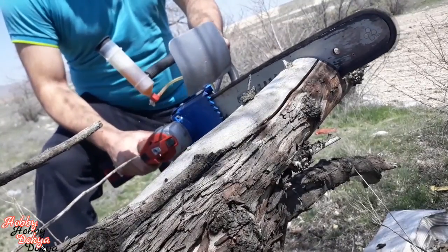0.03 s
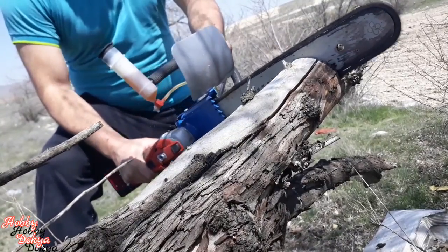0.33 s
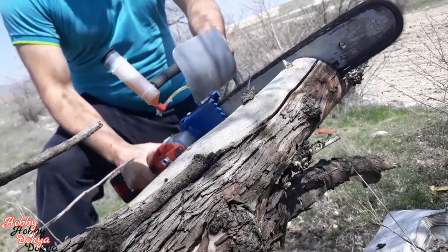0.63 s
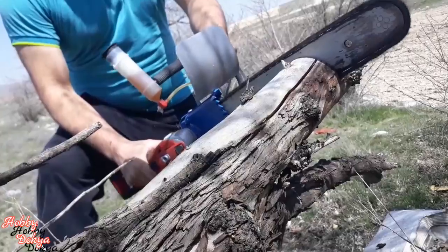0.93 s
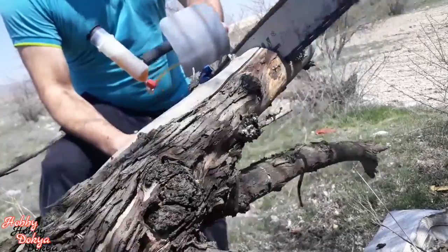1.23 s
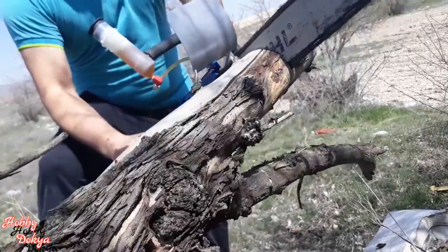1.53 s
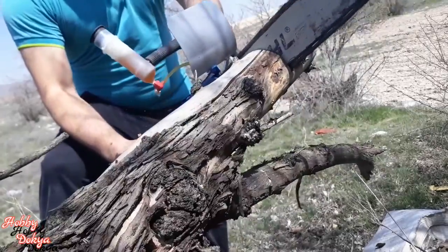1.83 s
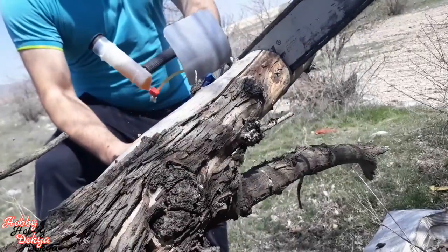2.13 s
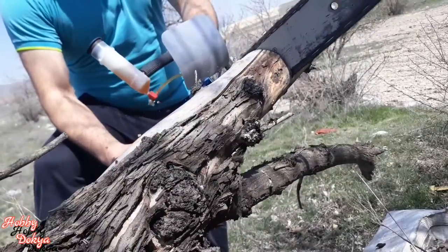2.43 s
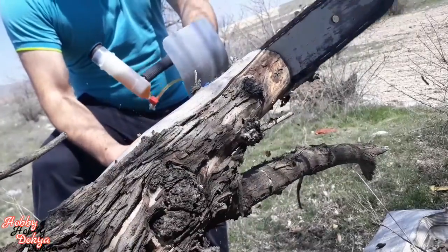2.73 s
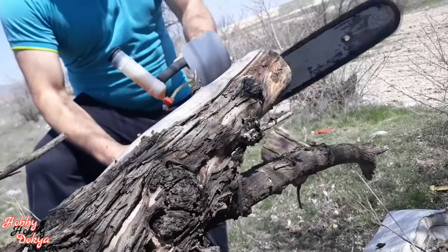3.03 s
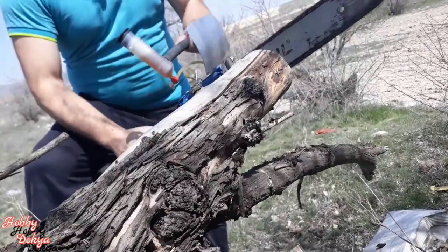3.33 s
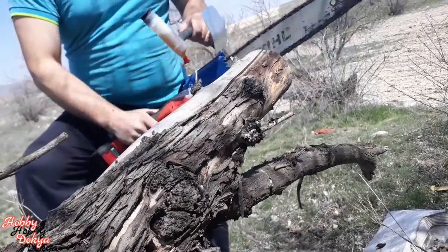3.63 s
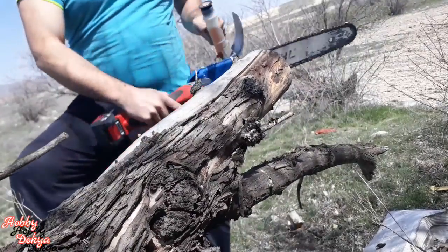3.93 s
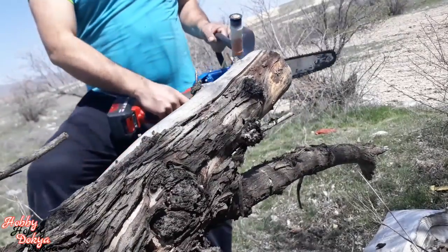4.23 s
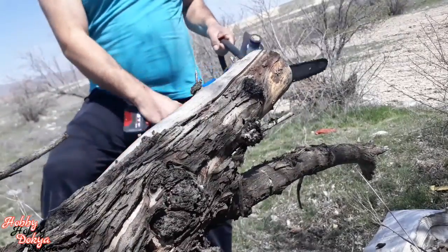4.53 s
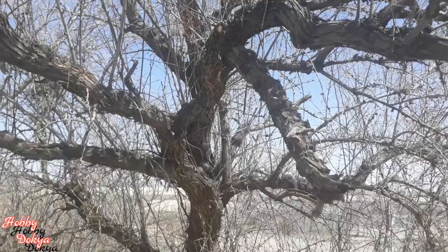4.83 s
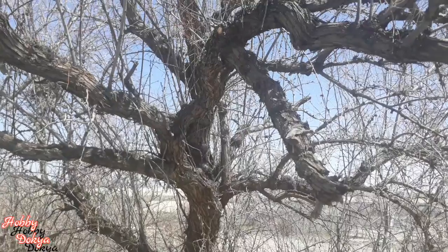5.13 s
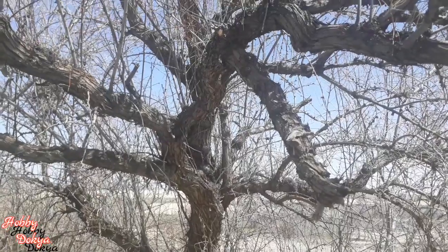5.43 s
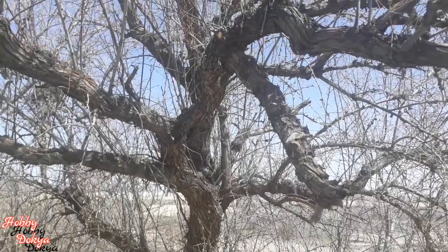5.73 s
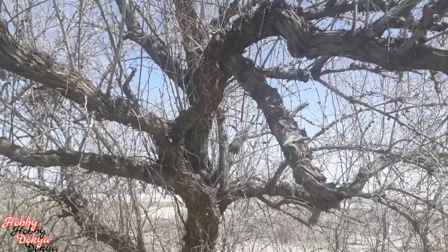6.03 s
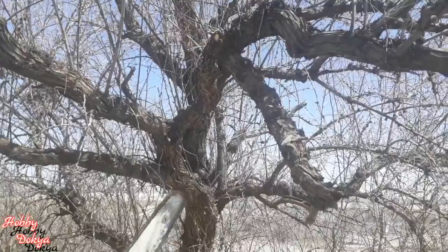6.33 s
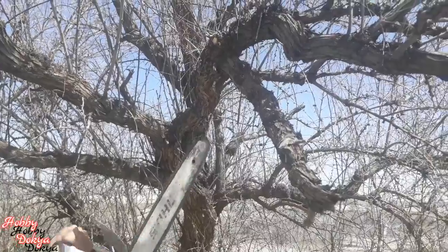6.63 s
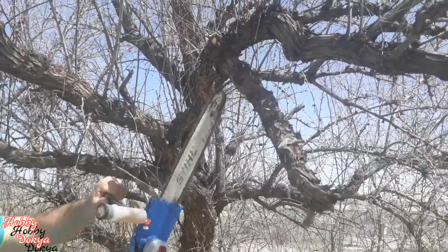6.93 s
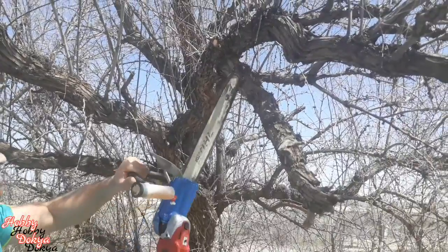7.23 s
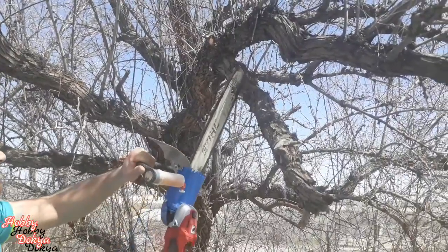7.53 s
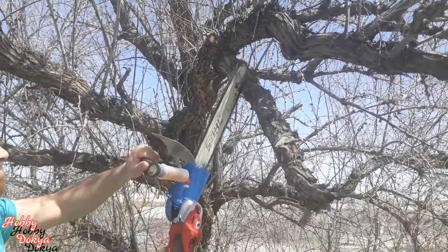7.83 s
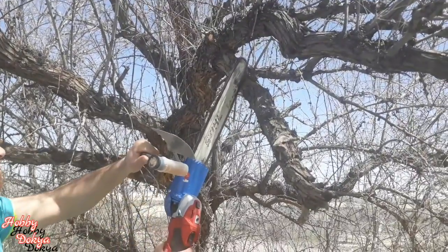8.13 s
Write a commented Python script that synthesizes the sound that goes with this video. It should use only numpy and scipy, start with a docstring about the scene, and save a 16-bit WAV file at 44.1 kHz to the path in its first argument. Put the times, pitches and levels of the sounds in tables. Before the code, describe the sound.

A cordless electric chainsaw chatters loudly through a dry log in quiet open air. It breaks through with a wooden knock, races briefly, then winds down, the slack chain rattling and clacking to a stop. The trigger clicks, a thin high whine starts, and the chain climbs smoothly to a fast, hissing whir. Near the end the tip grazes a branch with a short, bright rasp.

```python
"""A cordless angle grinder fitted with a chainsaw bar cuts a dry log in quiet open air.
First the teeth chatter in the kerf, and their impacts excite the modes of bar and log. The chain breaks
through, races, then coasts against friction until its slack links clack to a stop. The trigger clicks,
the motor drive whines, and a soft start ramps the chain up to full speed. Last, the tip grazes a branch."""
import sys
import numpy as np
from scipy import signal
from scipy.fft import rfft, irfft, next_fast_len
from scipy.io import wavfile
from scipy.ndimage import uniform_filter1d

SR = 44100
rng = np.random.default_rng(int(sys.argv[2]) if len(sys.argv) > 2 else 0)


def inscribe(sig):
    """Save sig as 16-bit PCM at rate SR to the path in sys.argv[1].

    A 1-D sig is mono; a 2-D sig holds one channel per row.
    Samples are clipped to [-1, 1] before scaling.
    """
    pcm = np.round(np.clip(np.atleast_2d(sig).T, -1, 1) * 32767)
    wavfile.write(sys.argv[1], SR, pcm.astype(np.int16))


N = 361179
TIME = np.arange(N) / SR
# the chain breaks through, the trigger is released, the chain stops, the motor restarts
BREAK_S, RELEASE_S, STOP_S, START_S = 2.88, 3.27, 4.77, 5.16
LOADED_SPEED, TOP_SPEED = 89.8, 119.35  # sprocket in the wood and running free, turns/s
GEAR_RATIO = 2.707  # motor turns per sprocket turn

# snags of the teeth: t/s, half-width/s, loss of speed/(turns/s)
TOOTH_SNAGS = [(1.19, .03, 40), (1.65, .04, 12)]
# bounce of the bar in the kerf: t/s, modulation depth/dB
BAR_BOUNCE = [(0, 2.5), (.92, 2), (1.04, 5), (1.3, 3.5), (1.62, 1), (2.08, 2.5), (2.4, 2.3), (2.56, 3.5),
              (2.88, 2.1)]
# the cut as the kerf deepens: t/s, body level/dB, clatter level/dB, hiss level/dB
CUT_LEVELS = [(0, -39.5, -25.5, -26.5), (1.0, -37.5, -25, -26.8), (1.65, -35.5, -25, -27.5),
              (2.2, -35.5, -24, -26), (2.68, -34.5, -27.5, -28), (2.88, -33.5, -26.5, -27.4)]
# spectra of the chain cutting, coasting, driven slowly and driven fast: f/Hz, relative level/dB
CUT_SPECTRUM = [(24, -44), (40, -31.5), (110, -12), (165, -14.5), (225, -4), (340, -8), (450, -8),
                (700, -6), (1800, -2), (2600, -1), (6400, -3.5), (9400, -21.5), (11500, -16),
                (15500, -20.5)]
COAST_SPECTRUM = [(59, -61), (100, -33), (330, -27.5), (450, -17), (560, -23), (950, -15), (1200, -5),
                  (2400, -3), (3800, 3), (6900, 1.5), (9300, -12), (11100, -7.5), (15500, -9.5)]
SLOW_SPECTRUM = [(59, -60), (100, -39), (330, -24.5), (560, -13.5), (1000, -14), (1500, -12.5),
                 (2000, -8.5), (4200, 2), (6500, 2.5), (8100, -5.5), (11200, -12), (12200, -14),
                 (15500, -16.5)]
FAST_SPECTRUM = [(59, -43), (100, -32), (330, -34), (600, -23), (800, -15.5), (1060, -17), (2000, -15),
                 (2800, -13), (4200, -5.5), (6000, 6.5), (8060, 0.5), (11000, -3), (12300, -5),
                 (15500, -6.5)]
# resonances of bar and guard in the same four states: f/Hz, bandwidth/Hz, lift/dB
CUT_PEAKS = [(406, 110, 6), (813, 43, 6.5), (1060, 310, 3), (1500, 75, 3.5), (1753, 130, 5),
             (2170, 120, 2.5), (2533, 290, 5), (2973, 270, 3.5), (4055, 79, 6), (5450, 180, 4),
             (7090, 360, 2), (8400, 430, 2.5), (10400, 460, 2.0), (14100, 540, 1.5)]
COAST_PEAKS = [(793, 170, 11), (1170, 120, 2.8), (1510, 140, 5.1), (1840, 320, 6.8), (3015, 78, 8.5),
               (3470, 44, 3.5), (3750, 96, 5.3), (4500, 270, 3.2), (5380, 670, 2.9), (6900, 320, 1.3),
               (7520, 220, 4.7), (8450, 430, 3.7), (10340, 470, 3.5), (13600, 420, 1.5)]
SLOW_PEAKS = [(590, 34, 3.3), (1227, 93, 6.4), (1444, 190, 7), (1660, 83, 4.4), (2390, 470, 2.9),
              (4280, 380, 4.5), (5120, 280, 2.2), (7140, 390, 2.1), (8540, 400, 2.9), (10300, 210, 4.2),
              (10900, 420, 4.6), (13500, 540, 3.0)]
FAST_PEAKS = [(1320, 120, 6.4), (1500, 60, 5.9), (1640, 89, 5.5), (2440, 290, 7.7), (3070, 160, 2.9),
              (3600, 110, 6.3), (4470, 120, 2.0), (4850, 470, 2.9), (6010, 420, 5.4), (6700, 360, 1.6),
              (7600, 260, 3.5), (8730, 560, 4.7), (10000, 450, 2.5), (11000, 740, 6.7), (13150, 470, 1.5)]
# modes of the log, shifting as the kerf deepens: first f/Hz, last f/Hz, bandwidth/Hz, relative level/dB
LOG_RESONANCES = [(130.6, 120, 4.7, -54), (280.4, 300, 3.7, -52), (436.3, 320, 18, -48.5)]
# passing modes of the wood: f/Hz, bandwidth/Hz, relative level/dB, share of the cut where loudest
KERF_RESONANCES = [(281, 49, -43.5, 0.12), (132, 28, -45, .03), (2730, 180, -35, .48),
                   (1750, 130, -37.5, 0.59), (399, 30, -44.5, 0.67), (985, 190, -38.5, .62),
                   (131, 8.1, -44.5, 0.704), (628, 17, -50, 0.46), (620, 86, -38.5, 0.844),
                   (305, 21, -39.5, 0.827), (416, 29, -47, 1)]
# hum of the six-toothed sprocket and the motor: multiple of the sprocket rate, relative level/dB
HUM_ORDERS = [(2.707, -60), (4, -60), (5.414, -52), (6, -41), (7, -50), (8.12, -54), (10.83, -53),
              (12, -52), (14, -55), (19, -50), (20, -51), (27.07, -48)]
# outdoor background: f/Hz, relative level/dB
AIR_SPECTRUM = [(15, -34), (25, -6.5), (49, -9.5), (103, -5.5), (383, -19), (879, -15), (1240, -22),
                (4380, -24.5), (9770, -35), (15000, -33)]
# knocks of wood and handling: t/s, f/Hz, bandwidth/Hz, decay time/s, level/dB
KNOCKS = [(2.83, 540, 140, 0.024, -32.5), (3.006, 250, 91, 0.035, -45.5), (4, 170, 149, 0.013, -57),
          (4.735, 151, 200, .006, -70), (7.101, 230, 150, 0.054, -52), (7.241, 260, 260, 0.041, -49.5)]
# bar modes while coasting: f/Hz, bandwidth/Hz, relative level/dB, speed where loudest/(turns/s)
COAST_RESONANCES = [(1826, 180, -43, 113), (3690, 170, -38, 90), (850, 140, -46, 66), (610, 44, -63, 25)]
# impacts of slack chain and trigger: t/s, relative level/dB, treble gain/dB, decay time/s
CLACK_EVENTS = [(4.1707, -30, 6, 0.0023), (4.2025, -28, 3, 0.0027), (4.236, -32, 3, .004),
                (4.2765, -30.5, 4, 0.0025), (4.3216, -35, 3.5, .004), (4.37, -29.5, 0, 0.0028),
                (4.43, -35, 5, 0.0021), (4.8933, -49, -19, .002), (4.997, -47, -9, .003),
                (5.067, -28.5, -4.5, .0014), (5.082, -39, -2, .0016)]
# spectrum of clacks and scrapes: f/Hz, relative level/dB
CONTACT_SPECTRUM = [(180, -48), (300, -26), (700, -17), (1370, -2.5), (2700, -3), (4400, -0.5), (6200, 1.5),
                    (7200, -0.5), (9600, -19), (12000, -10), (15000, -15)]
# the last links dragging round the bar: t/s, half-width/s, relative level/dB
LINK_DRAGS = [(4.498, 0.013, -47.5), (4.585, 0.014, -53), (4.627, 0.017, -58)]
# switching whine of the soft start: t/s, level/dB
WHINE_LEVELS = [(5.075, -65), (5.2, -53), (5.45, -46.5), (6.1, -34.5), (6.42, -35.5), (7.0, -62)]
# the driven chain: speed/(turns/s), body level/dB, clatter level/dB, hiss level/dB
DRIVEN_LEVELS = [(1, -71, -69, -72), (6.03, -70.5, -58.5, -69), (20, -55.5, -41, -47),
                 (38.3, -52, -31.5, -37), (80, -48, -25.5, -25.5), (107, -42.5, -28.5, -25.5),
                 (123.7, -49, -28, -21)]
# bands of the chain's noise that swell and sink in pitch as the saw speeds up:
# f/Hz, bandwidth/Hz, level/dB, speed where loudest/(turns/s)
DRIVEN_NOISE_BANDS = [(1717, 150, -47, 25), (575, 90, -53, 45), (1740, 130, -45, 46), (4350, 450, -32, 49),
                      (1390, 170, -41, 74), (3700, 180, -30, 86), (5160, 360, -30, 80),
                      (1820, 180, -39, 104), (7160, 1000, -26, 106.2)]
# teeth flicking the branch: t/s, level/dB
GRAZE_LEVELS = [(7.03, -47), (7.11, -24), (7.2, -29.5), (7.28, -26), (7.34, -31), (7.45, -55)]
# peak and dip of the microphone's response: f/Hz, bandwidth/Hz, lift/dB
MICROPHONE_RESPONSE = [(7040, 1200, 1.5), (8000, 420, -3)]


def amp(db):
    """Amplitude ratio of a level in decibels."""
    return 10 ** (np.asarray(db) / 20)


def unit_rms(x):
    """Normalisation to an rms of 1."""
    return x / np.sqrt(np.mean(x ** 2) + 1e-20)


def curves(rows):
    """Linear interpolation in time of each column after the first."""
    times, *columns = np.transpose(rows)
    return [np.interp(TIME, times, column) for column in columns]


def gate(start, end, fade):
    """A window of unit height from start to end, fading outside them."""
    return np.sqrt(np.clip(1 - np.maximum(start - TIME, TIME - end) / fade, 0, 1))


def bell(control, centre, spread):
    """A Gaussian of unit height, falling to 1/e at one spread from the centre."""
    return np.exp(-((control - centre) / spread) ** 2)


def drift(cutoff_hz):
    """Random fluctuation: low-passed noise of rms 1."""
    count = N // 32
    hz = np.fft.rfftfreq(count, TIME[-1] / count)
    slow = irfft(rfft(rng.standard_normal(count)) / (1 + (hz / cutoff_hz) ** 4), count)
    return np.interp(TIME, np.linspace(0, TIME[-1], count), unit_rms(slow))


def swell(turns, depth_db):
    """Amplitude modulation at one cycle per turn."""
    return amp(depth_db * np.cos(2 * np.pi * turns))


def impacts(per_s, spread_db, rub):
    """Shot noise of uneven impacts, plus Gaussian noise for smooth rubbing."""
    size = amp(spread_db * np.minimum(rng.exponential(1, N), 3))
    hits = size * rng.choice([-1, 1], N) * (rng.random(N) < per_s / SR)
    return unit_rms(hits) + rub * rng.standard_normal(N)


def coloured(x, spectrum, peaks=()):
    """A minimum-phase filter of unit power gain: resonance peaks on a broad spectral envelope."""
    hz = np.fft.rfftfreq(4096, 1 / SR)
    f, level = np.transpose(spectrum)
    db = np.interp(np.log(hz + 1), np.log(f + 1), level)
    for centre, width, lift in peaks:
        db = db + lift / (1 + (2 * (hz - centre) / width) ** 2)
    log_gain = np.log(amp(np.r_[db, db[-2:0:-1]]))
    taps = np.fft.ifft(np.exp(np.conj(signal.hilbert(log_gain)))).real[:len(hz)]
    return signal.oaconvolve(x, taps / np.linalg.norm(taps))[:N]


def resonate(x, hz, width):
    """Forced response of a double-pole resonator whose frequency may move, scaled to rms 1."""
    carrier = np.exp(2j * np.pi * np.cumsum(hz * np.ones(len(x))) / SR)
    pole = np.exp(-np.pi * width / SR)
    baseband = signal.lfilter([1], [1, -2 * pole, pole * pole], x / carrier + 1e-18)
    return unit_rms((carrier * baseband).real)


def gliding_bands(x, bands, control, spread, sink):
    """Band-pass filtering: each band of x swells and glides as the control passes its place."""
    out = np.zeros(N)
    for hz, width, db, place in bands:
        glide = 1 - sink * np.tanh((control - place) / spread)
        out += amp(db) * bell(control, place, spread) * resonate(x, hz * glide, width)
    return out


def band_levels(x, levels_db):
    """Gain control in three bands: body below 1 kHz, clatter up to 5 kHz, hiss above."""
    size = next_fast_len(N, True)
    hz, spectrum = np.fft.rfftfreq(size, 1 / SR), rfft(x, size)
    body, below_hiss = 1 / (1 + (hz / 1000) ** 8), 1 / (1 + (hz / 5000) ** 8)
    out = np.zeros(N)
    for share, db in zip((body, below_hiss - body, 1 - below_hiss), levels_db):
        band = irfft(spectrum * share, size)[:N]
        running_rms = np.sqrt(abs(uniform_filter1d(band ** 2, size=9000)) + 1e-12)
        out += band * amp(db) / running_rms
    return out


def sprocket_speed(race_s=.12, braking_power=1.43, ramp_turns_per_s2=61, settle_s=.16):
    """Rotation in turns/s: loaded by wood, relaxing upward, braked by friction, then ramped up."""
    loaded = LOADED_SPEED - sum(loss * bell(TIME, s, length) for s, length, loss in TOOTH_SNAGS)
    powered = TOP_SPEED + (loaded - TOP_SPEED) * np.exp(-np.maximum(TIME - BREAK_S, 0) / race_s)
    braked = TOP_SPEED * np.clip((STOP_S - TIME) / (STOP_S - RELEASE_S), 0, 1) ** braking_power
    ramp, last_stretch = ramp_turns_per_s2 * (TIME - START_S), ramp_turns_per_s2 * settle_s
    knee = TOP_SPEED - last_stretch
    settling = last_stretch * (1 - np.exp(-np.maximum(ramp - knee, 0) / last_stretch))
    speed = np.where(TIME < START_S, np.minimum(powered, braked), np.minimum(ramp, knee) + settling)
    return np.maximum(speed, .1) * (1 + .001 * drift(12))


def cutting(turns, log_fade_db=22.5):
    """Impact excitation: teeth drive bar and log, the bar bouncing every second sprocket turn."""
    progress = np.minimum(TIME / BREAK_S, 1)
    bounce_db = curves(BAR_BOUNCE)[0] * np.cos(2 * np.pi * (turns / 2 + 0.071 * drift(40)))
    tearing = impacts(4200, spread_db=3., rub=0.59) * amp(1.1 * drift(130))
    bites = tearing * amp(bounce_db)
    body, clatter, hiss = curves(CUT_LEVELS)
    levels_db = (body + bounce_db, clatter + 1.19 * bounce_db, hiss + 0.68 * bounce_db)
    teeth = band_levels(coloured(tearing, CUT_SPECTRUM, CUT_PEAKS), levels_db)
    boom = sum(amp(db) * resonate(bites, first + (last - first) * progress ** 2, width)
               for first, last, width, db in LOG_RESONANCES)
    boom *= amp(-log_fade_db * progress ** 6)  # dies as the log is cut through
    kerf = gliding_bands(bites, KERF_RESONANCES, progress, spread=.13, sink=0.041)
    return (teeth + boom + kerf) * gate(0, BREAK_S, fade=0.06)


def drive_hum(speed, turns):
    """Rotational orders: sprocket and motor give tones that grow steeply with speed."""
    hum = sum(amp(db + 2.0 * drift(10)) * np.sin(2 * np.pi * (order * turns + rng.random()))
              for order, db in HUM_ORDERS)
    return hum * (speed / TOP_SPEED) ** 12 * np.where(TIME > START_S, amp(2.0), amp(-4.5))


def open_air(db=-69.5):
    """Ambient noise: stationary, and strongest at low frequencies."""
    return amp(db) * coloured(rng.standard_normal(N), AIR_SPECTRUM)


def thuds():
    """Damped resonance: each knock of wood or handling excites one low, quickly dying mode."""
    out = np.zeros(N)
    for s, hz, width, decay, db in KNOCKS:
        on = abs(TIME - s) < .5
        age = np.maximum(TIME[on] - s, 0) / decay
        envelope = amp(db) * np.sqrt(age) * np.exp(1 - age)
        out[on] += envelope * resonate(rng.standard_normal(len(age)), hz, width)
    return out


def guard_drone(speed, turns, centre_hz=450, width_hz=130):
    """Forced vibration: out of the wood, sprocket and motor orders sweep through the guard's resonance."""
    out = np.zeros(N)
    for order in (GEAR_RATIO, 4, 5, 2 * GEAR_RATIO, 6):
        detuning = 2 * (order * speed - centre_hz) / width_hz
        out += np.sin(2 * np.pi * order * turns + 0.39 * drift(17)) / (1 + detuning ** 2)
    return out * amp(-51.5) * bell(speed, centre=94, spread=30) * (TIME > BREAK_S)


def coasting(speed, turns, hang_speed=22):
    """Modulated impact noise: loose links slap the bar once a turn and hang quiet at a crawl."""
    slaps = turns - np.interp(STOP_S, TIME, turns) - .1
    slap_db = np.interp(speed, [25, 55, 110], [2.2, 4.4, 1.6])
    links = impacts(500 + 34 * speed, spread_db=1.5, rub=0.4) * swell(slaps, slap_db)
    halvings = np.log2(TOP_SPEED / speed)
    levels_db = (-45.5 - 4.5 * halvings, -30 - 7 * halvings, -31.5 - 9 * halvings)
    rattle = band_levels(coloured(links, COAST_SPECTRUM, COAST_PEAKS), levels_db)
    bar = gliding_bands(links, COAST_RESONANCES, speed, spread=20, sink=-0.024)
    attenuation = (1 + (hang_speed / speed) ** 4) ** 0.18
    return (rattle + bar) / attenuation * gate(BREAK_S + 0.05, STOP_S, fade=0.036)


def clacks(rise_s=0.00099, ring_ratio=4, ring_db=-15):
    """Impact transients of slack chain and trigger: a burst of contact, then a weaker, slower decay."""
    force, edge = np.zeros((2, N))
    for s, db, treble_db, decay in CLACK_EVENTS:
        age = np.maximum(TIME - s, 0)
        dying = np.exp(-age / decay) + amp(ring_db) * np.exp(-age / (ring_ratio * decay))
        blow = amp(db) * (1 - np.exp(-(age / rise_s) ** 2)) * dying
        force += blow
        edge += blow * amp(treble_db)
    contact = rng.standard_normal(N)
    dull = uniform_filter1d(contact, size=5)
    return amp(-1) * coloured(force * dull + edge * (contact - dull), CONTACT_SPECTRUM)


def drags():
    """Sliding friction: the last links scrape softly round the steel bar."""
    pressure = sum(amp(db) * bell(TIME, s, length) for s, length, db in LINK_DRAGS)
    return coloured(pressure * rng.standard_normal(N), CONTACT_SPECTRUM)


def bump(s=4.762, hz=105, length=0.0054, db=-43):
    """A Gaussian tone pulse of about one cycle, heard as a soft low bump."""
    return amp(db) * np.sin(2 * np.pi * hz * (TIME - s)) * bell(TIME, s, length)


def trigger_squeak(s=5.015, length=0.033, hz=4100, fall_hz_per_s=7000, width_hz=280, db=-61):
    """Friction excites a faint, falling resonance as the trigger is squeezed."""
    pitch = hz - fall_hz_per_s * np.clip(TIME - s, -length, length)
    return amp(db) * bell(TIME, s, length) * resonate(rng.standard_normal(N), pitch, width_hz)


def switching_whine(speed, hz=3175):
    """Periodic switching in the motor drive gives a tone and its octave, with slight phase jitter."""
    phase = 2 * np.pi * hz * TIME + speed / TOP_SPEED * .7 * drift(30)
    tone = np.sqrt(2) * (np.sin(phase) + amp(-14) * np.sin(2 * phase))
    level_db = curves(WHINE_LEVELS)[0] + 1.9 * drift(18)
    return tone * amp(level_db) * gate(WHINE_LEVELS[0][0], WHINE_LEVELS[-1][0], fade=.01)


def running_up(speed, turns):
    """Impact noise of the free chain brightens with speed; near the top the motor's turns modulate it."""
    fast = np.clip((speed - 76) / 38, 0, 1)
    links = impacts(300 + 26 * speed, spread_db=.5, rub=0.57) * amp(0.72 * drift(105))
    links *= swell(turns, np.interp(speed, [25, 60, 115], [.6, 2.3, 1.1]))
    links *= swell(GEAR_RATIO * turns, .78 * fast)
    rattle = (1 - fast) * coloured(links, SLOW_SPECTRUM, SLOW_PEAKS)
    rattle += fast * coloured(links, FAST_SPECTRUM, FAST_PEAKS)
    speeds, *bands = np.transpose(DRIVEN_LEVELS)
    rattle = band_levels(rattle, [np.interp(np.log(speed), np.log(speeds), db) for db in bands])
    noise = rng.standard_normal(N)
    sinking_bands = gliding_bands(noise, DRIVEN_NOISE_BANDS, speed, spread=13.7, sink=0.053)
    return (rattle + sinking_bands) * gate(START_S, TIME[-1], fade=0.089)


def gear_whirr(speed, order=34.6, db=-32):
    """Narrow-band gear noise during the ramp, its frequency proportional to the speed."""
    whirr = resonate(rng.standard_normal(N), order * speed, width=280)
    return amp(db) * bell(speed, centre=93, spread=30) * whirr * (TIME > START_S)


def graze(turns, hz=8900, width_hz=1000, tail_turns=0.081):
    """Periodic excitation: the tip flicks the bark every second sprocket turn with a bright rasp."""
    age_turns = turns % 2
    flicks = rng.standard_normal(N) * np.sqrt(age_turns) * np.exp(-age_turns / tail_turns)
    touching = gate(GRAZE_LEVELS[0][0], GRAZE_LEVELS[-1][0], fade=.02)
    return amp(curves(GRAZE_LEVELS)[0]) * resonate(flicks, hz, width_hz) * touching


def scene():
    """Superposition of all sources; one shaft speed governs chain and motor."""
    speed = sprocket_speed()
    turns = np.cumsum(speed) / SR
    air = open_air()
    chain = cutting(turns) + coasting(speed, turns) + running_up(speed, turns) + graze(turns)
    contacts = clacks() + drags() + trigger_squeak() + thuds() + bump()
    drive = drive_hum(speed, turns) + gear_whirr(speed) + switching_whine(speed)
    return (chain + drive + guard_drone(speed, turns) + contacts + air)[None]


def record(dry, cutoff_hz=15750):
    """Linear filtering: the microphone's response, then a steep low-pass."""
    heard = coloured(dry[0], [(20, 0), (20000, 0)], MICROPHONE_RESPONSE)
    low_pass = signal.firwin(611, cutoff_hz, window=("kaiser", 9), fs=SR)
    return signal.oaconvolve(heard, low_pass, "same")[None]


dry = scene()
out = record(dry)
inscribe(out)
```